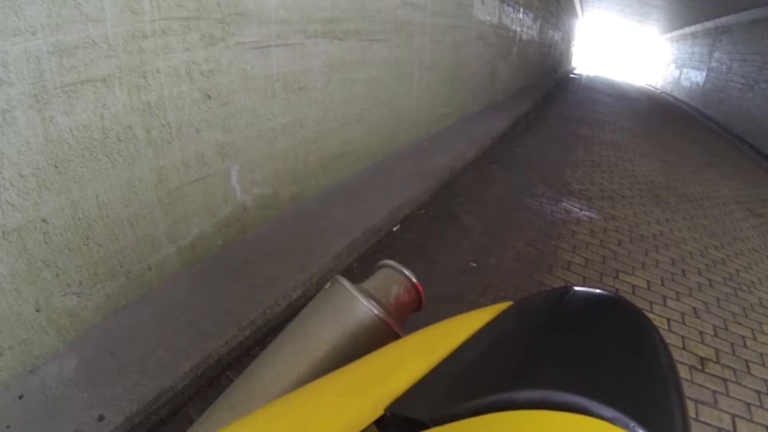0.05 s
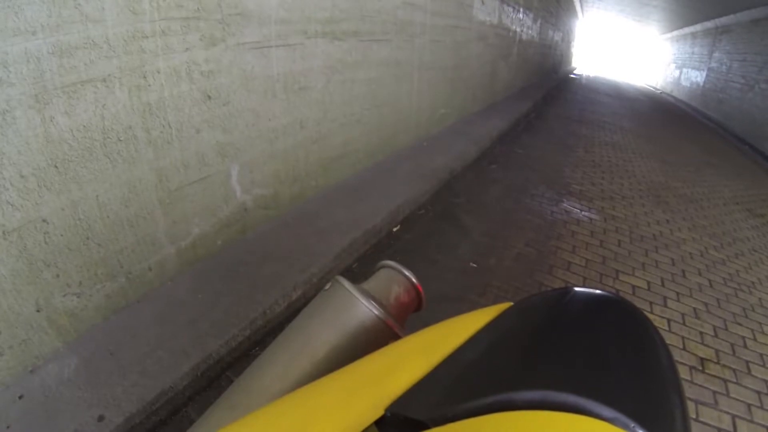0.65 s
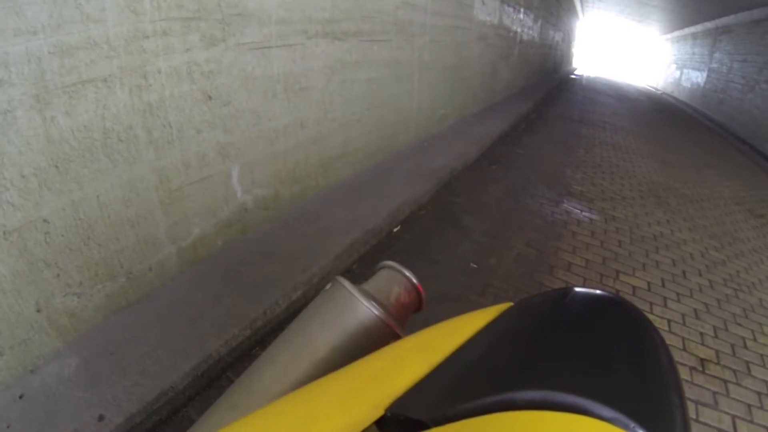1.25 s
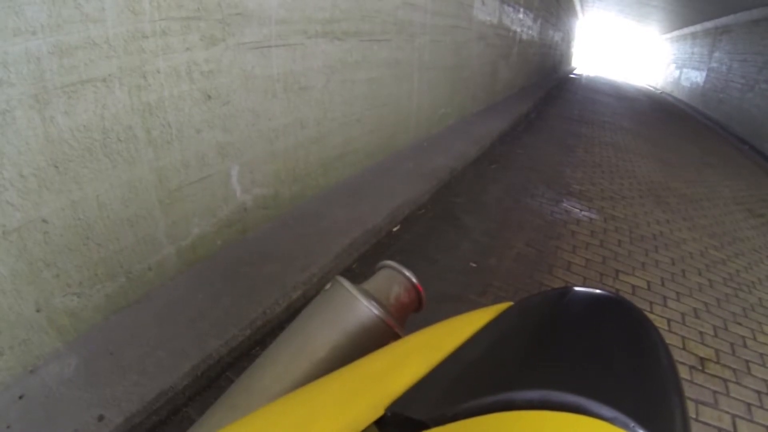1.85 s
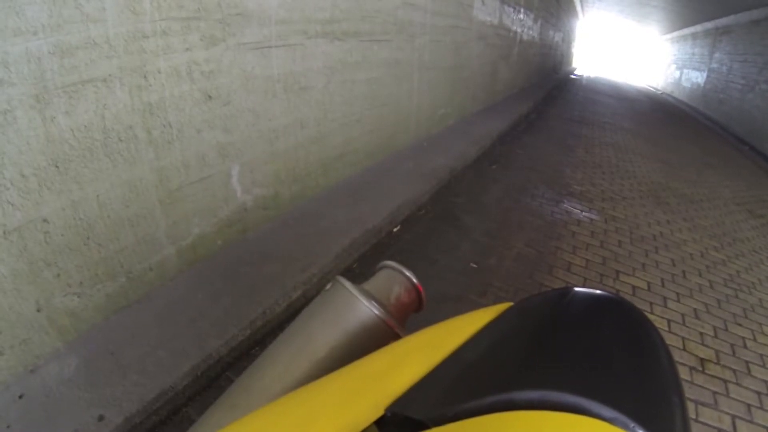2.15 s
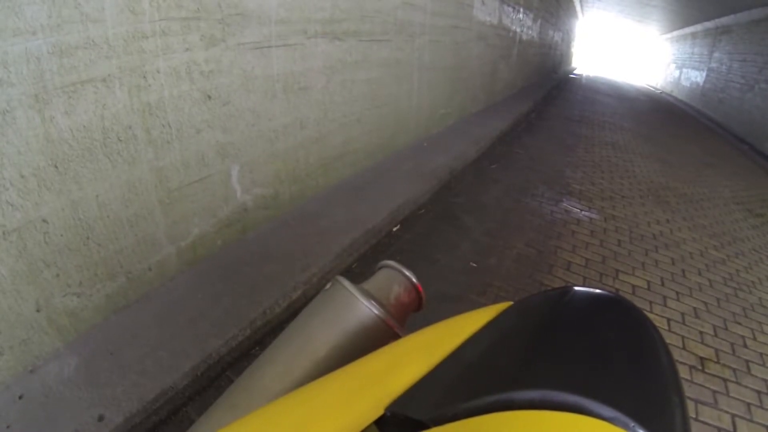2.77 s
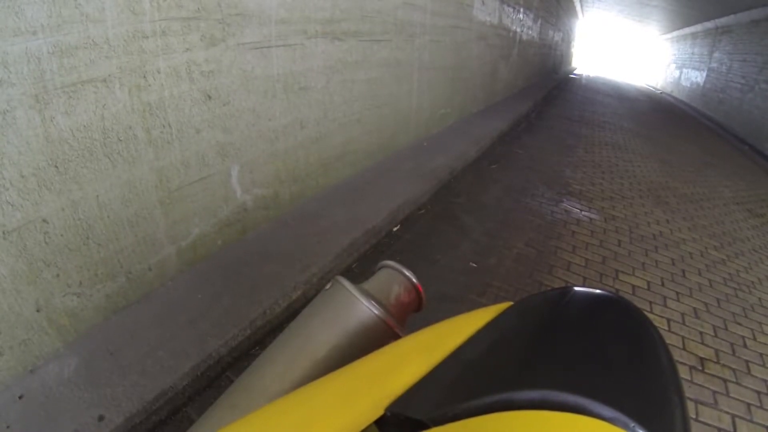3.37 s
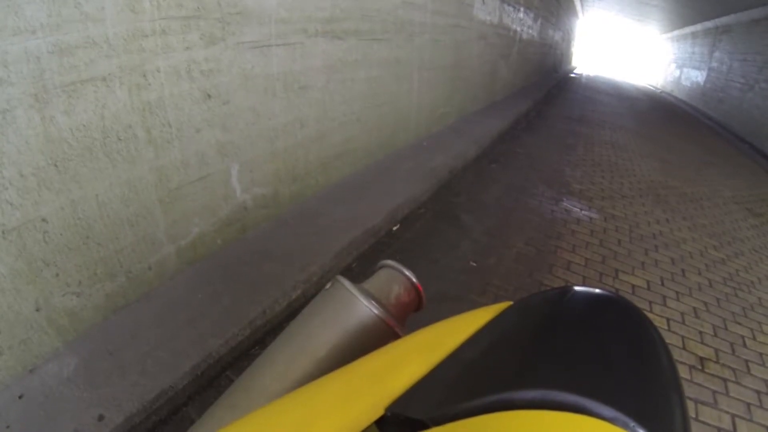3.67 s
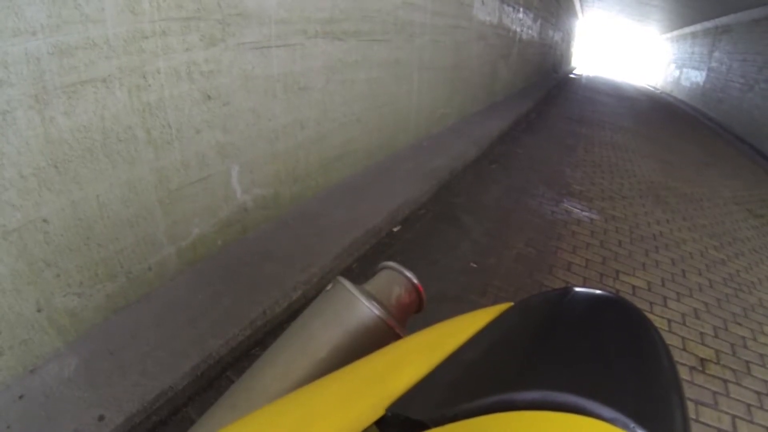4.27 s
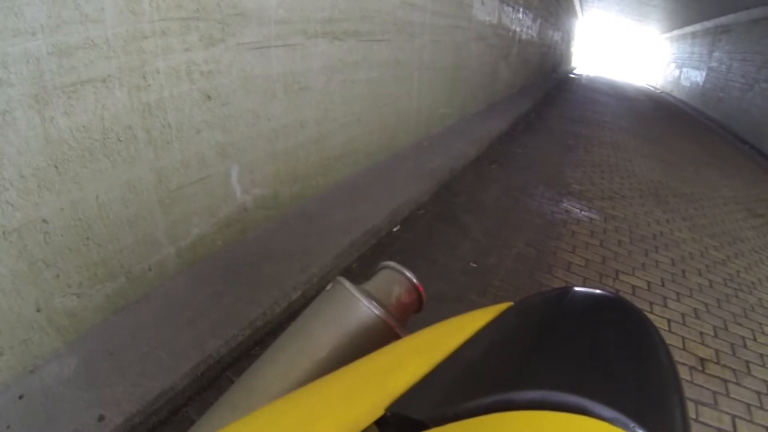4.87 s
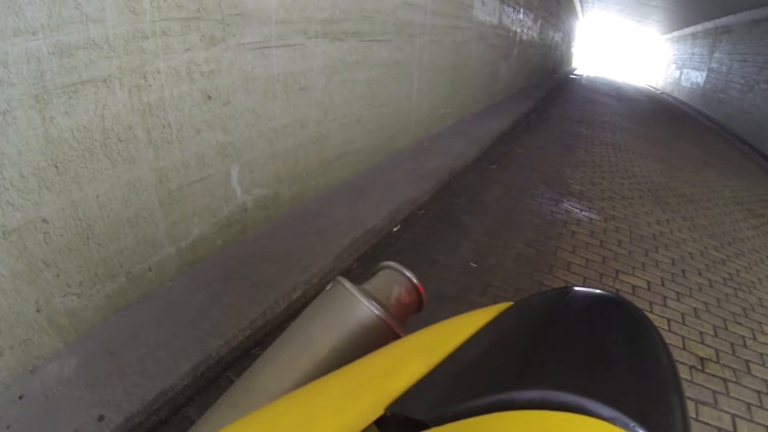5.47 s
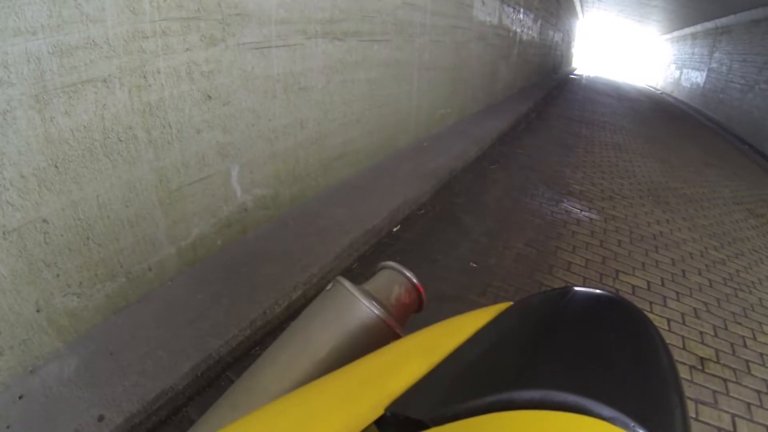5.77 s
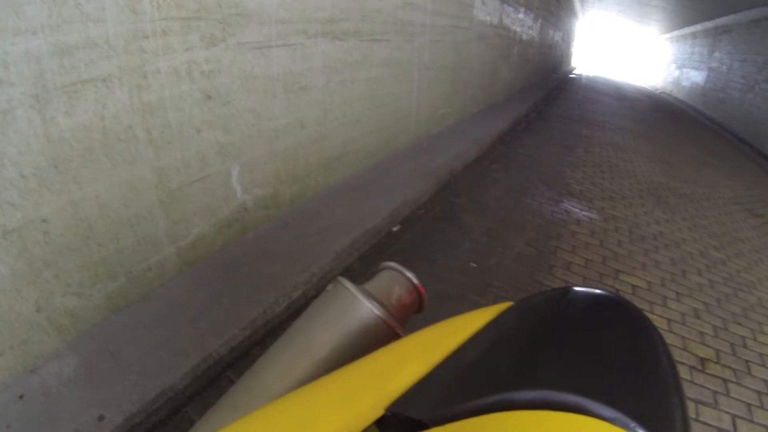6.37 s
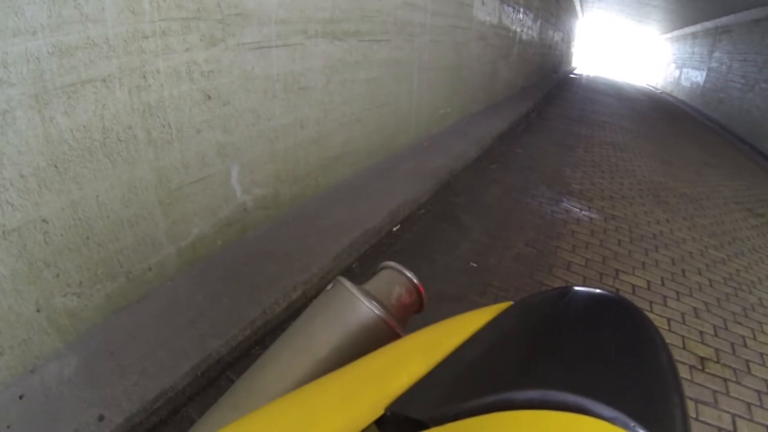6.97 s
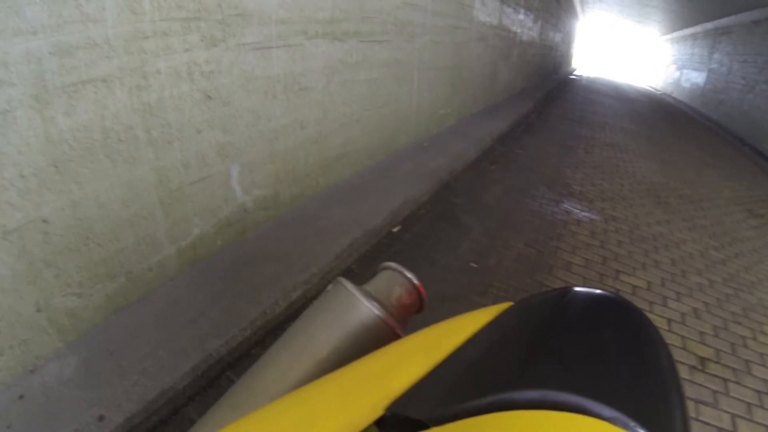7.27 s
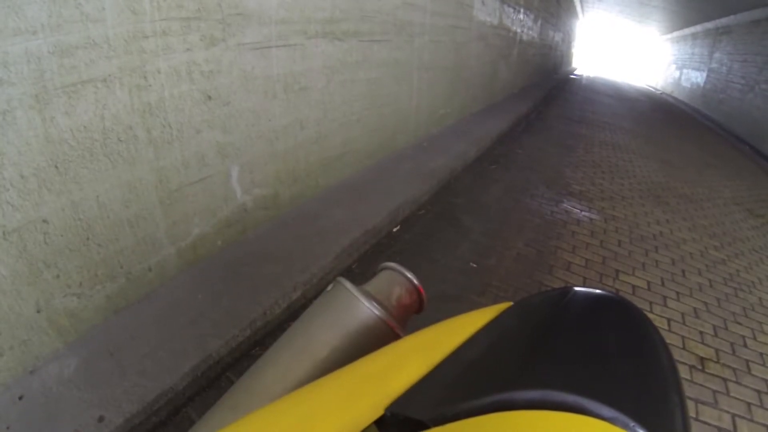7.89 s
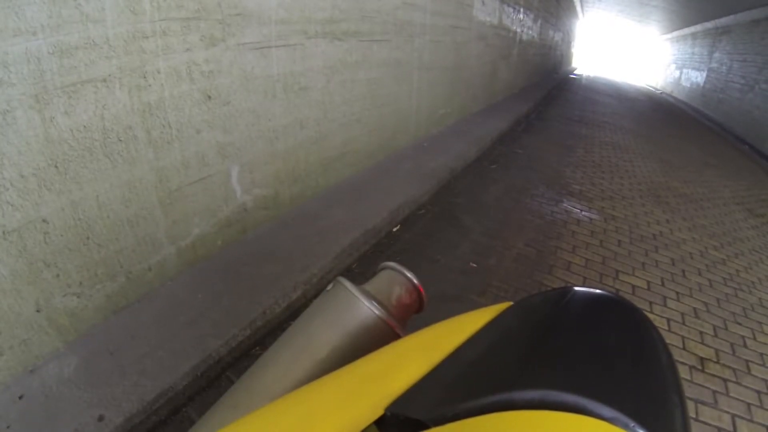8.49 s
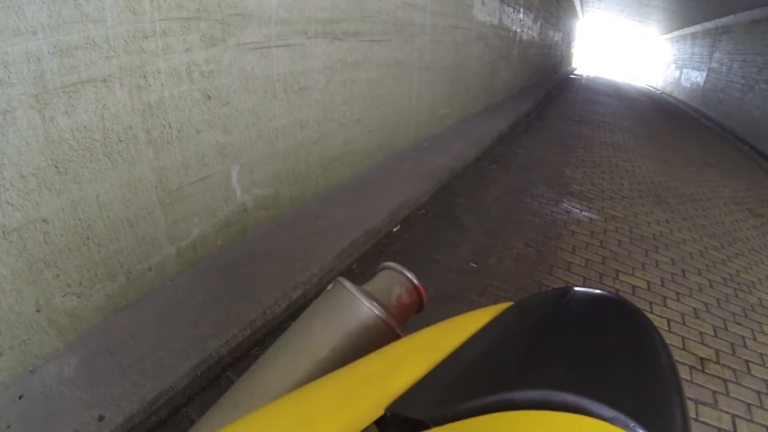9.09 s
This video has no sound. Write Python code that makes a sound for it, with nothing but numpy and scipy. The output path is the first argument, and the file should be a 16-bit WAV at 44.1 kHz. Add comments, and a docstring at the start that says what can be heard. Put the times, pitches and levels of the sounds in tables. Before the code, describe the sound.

A parked motorcycle idles with a deep thump and is revved three times, its exhaust popping and echoing in a concrete underpass.

```python
"""A parked V-twin motorcycle idles in a concrete underpass and is revved three times.
Each exhaust stroke fires a pressure pulse: round at idle, sharp under throttle, soft and ragged as
the engine coasts down, while the pipe burbles and barks and unburnt fuel pops in the silencer.
Valves clatter, slack metal clanks, gas roars and hisses, and a gear whines faintly.
The walls throw the exhaust back as echoes, a boom and a long tail over a low rumble."""
import sys
import numpy as np
from scipy import signal
from scipy.fft import rfft, irfft, next_fast_len
from scipy.io import wavfile
from scipy.ndimage import uniform_filter1d

SR = 44100
rng = np.random.default_rng(int(sys.argv[2]) if len(sys.argv) > 2 else 0)


def bounce(signal):
    """Save signal as a 16-bit WAV file at the path given by the first command-line argument."""
    frames = np.transpose(np.atleast_2d(signal))
    limited = np.clip(frames, -1, 1)
    pcm = np.round(limited * 32767).astype(np.int16)
    wavfile.write(sys.argv[1], SR, pcm)


N = 403074
TIME = np.arange(N) / SR
GRAIN_S = np.arange(-SR // 50, SR // 50) / SR  # time axis of one short hit, zero in the middle

# Idle speed, a little high after each rev; speeds count four-stroke cycles: time_s, speed_hz
IDLE = [(0, 10.96), (.8, 10.92), (2.55, 13.03), (3.2, 11.73), (3.4, 13.09), (5.05, 11.51), (5.25, 13.22),
        (5.65, 11.61), (6, 12.28), (8.1, 13.34), (8.7, 11.61), (9.14, 11.59)]
# Throttle blips, the last with a second stab:
# open_s, ease_s, shut_s, top_speed_hz, braking_hz_per_s, glide_hz_per_s
REVS = [(.822, 1.141, 1.262, 44.04, 44, 20.41), (3.396, 3.717, 3.82, 47.29, 44, 19.49),
        (5.964, 6.37, 6.375, 61.13, 43, 19), (6.43, 6.44, 6.445, 60.7, 51.19, 19.033)]
# Exhaust strokes, throttle shut and open: speed_hz, front_db, rear_db, width_ms, rear_lag_cycles
STROKES_SHUT = [(11.76, -7, -17.5, 0.84, .39), (13.43, -7, -17, 0.68, .38), (16.76, -5.5, -8, 0.65, .45),
                (20.17, -14, -9.5, 1.2, .47), (25.5, -20.5, -11.5, 1.25, .41), (26.8, -13.5, -9, 1.07, .39),
                (38.2, -11.5, -10.5, 0.61, 0.381), (46, -11.5, -8.5, 0.55, 0.39),
                (51.6, -11.5, -12, 0.45, 0.39), (56.5, -8.5, -8.5, 0.4, 0.395)]
STROKES_OPEN = [(12.9, -4, -9, .65, .345), (15.6, -2.2, -7, 0.48, 0.31), (18, -2.8, -3.8, 0.44, 0.32),
                (22.3, -4.3, -5.2, 0.45, .345), (27, -6, -4.8, 0.39, .37), (40, -4.3, -5.5, 0.36, .35),
                (58.4, -6.5, -3.5, 0.33, .355)]
# A soft third pulse in each cycle, at high speed with the throttle shut: speed_hz, level_db
AFTERPULSE = [(28, -36.5), (35, -20), (44, -22.5), (52, -18.5), (57, -25)]
# Stumbles just after the throttle eases: time_s, dip_db
STUMBLES = [(1.195, -4.5), (3.77, -2), (6.415, -5)]
# Afterfire in the silencer: time_s, level_db
POPS = [(1.891, -13.5), (1.939, -8.5), (1.985, -14), (4.028, -10.5), (4.559, -12.5), (4.657, -16),
        (4.774, -6.5), (6.615, -4.5), (6.961, -13), (7.019, -10), (7.434, -10.5), (7.475, -7.5),
        (7.523, -4.5), (7.530, -6.5), (7.627, -9), (7.636, -7.5), (7.755, -11.5)]
# Hollow bark of the front cylinder, throttle shut: speed_hz, level_db
BARK = [(11.2, -43), (12, -28.5), (13.3, -24), (14.5, -19.5), (17, -17), (23, -17.5), (29, -21.5),
        (42, -31)]
# Engine noise layers, throttle shut and open: speed_hz, roar_db, clatter_db, hiss_db
NOISES_SHUT = [(11.5, -31.5, -42, -83.5), (12.76, -32, -45, -80.5), (14.4, -26.5, -40, -70),
               (21, -28, -39, -66), (25, -26.5, -38, -64), (38.5, -25.5, -38, -59.5),
               (47, -18, -38.5, -66.5), (56.7, -19, -32.5, -61.5)]
NOISES_OPEN = [(15, -32, -39.5, -75), (22.1, -47, -37.5, -60), (33.5, -43.5, -37, -61.5),
               (44.4, -21.5, -38, -60.5), (57.2, -18.5, -33, -60)]
# Valve accents within each cycle: place_cycles, boost_db, width_cycles
VALVES = [(.29, 4, .04), (.75, 4, .04), (.85, 4, .035), (.96, 3.5, .035)]
# Rattle accents on the way up, at the top of a rev and on the way down: time_s, clatter_change_db
RATTLES = [(1.23, 4.5), (1.9, 3.5), (2.139, 2.5), (3.465, -2), (3.8, 7.5), (3.88, 6.5), (4.721, 2),
           (6.003, 1.5), (6.35, 0), (6.58, 7), (6.79, 2.5), (7.19, 4.5), (7.45, 4), (7.765, 2)]
# Slack metal clanking as the load changes and on the overrun: time_s, level_db
CLANKS = [(1.177, -29), (1.258, -30), (1.528, -30), (1.627, -28), (1.880, -31), (1.89, -31), (1.925, -30),
          (1.939, -30), (3.462, -31), (3.767, -26), (3.825, -30), (4.188, -29), (4.253, -35), (4.505, -27),
          (4.557, -33), (4.699, -38), (4.713, -35), (4.792, -38), (4.915, -31.5), (6.335, -26),
          (6.547, -24), (6.583, -29), (6.619, -28), (6.779, -30), (7.162, -28), (7.419, -28.5),
          (7.430, -35), (7.525, -32.5), (7.711, -30), (7.747, -30)]
# The ring of that metal: pitch_hz, level_db, t60_s
CLANK_MODES = [(1681, 0.5, .075), (1760, -11, 0.056), (1650, -10.5, 0.054), (2110, -13.5, 0.032),
               (1060, -13, .04)]
# Thumps that shake a loose part hardest: time_s, level_db
HARD_TICKS = [(0.793, -38), (2.7443, -44), (2.9884, -50), (3.239, -43), (3.3204, -45), (5.35, -48),
              (5.678, -42), (5.9344, -52), (6.0043, -31), (7.8106, -46), (8.2582, -38), (8.5, -40)]
# Thin spits of treble: time_s, level_db, width_s
SPITS = [(1.392, -65, 0.043), (1.727, -65, 0.0058), (4.025, -70, 0.045), (4.36, -61, 0.0084),
         (6.167, -66, 0.017), (6.594, -59.5, 0.025), (6.9, -64, 0.027), (7.233, -58, 0.009)]
# Gear whine at slow idle: speed_hz, level_db
GEAR_WHINE = [(10.9, -45.5), (11.7, -50), (12.6, -54), (14, -65)]
# Slaps off walls, floor and vault: delay_ms, gain
ECHOES = [(1.8, .08), (4.2, -.1), (5.7, -.11), (7.0, -.1), (8.4, .19), (16.6, .1), (17.6, .16), (24.7, .05),
          (33.1, .1), (41, .07), (44, -.12), (54, .1), (62.8, .05), (86, -.06), (96.6, -.06)]
# Standing waves across the underpass: pitch_hz, width_hz, level_db
BOOM = [(51.4, 12, 7), (101.1, 16, -.5), (121.9, 4, -0.5), (128.1, 4.7, -1), (165.7, 20, -6), (216, 10, -6),
        (344.6, 27, -2), (453, 13, -1.5)]
# Tones that keep sounding through the idle, two low ones ringing in the underpass and a faint high one:
# pitch_hz, waver_hz, level_db
HUMS = [(123.3, 4.4, -28.5), (241.2, 2.2, -31), (768, 8, -53)]
# Tone colour of each noise layer and of the reverb tail: frequency_hz, level_db
ROAR_EQ = [(170, -21), (350, 11), (600, 8.5), (670, 3.5), (765, 9), (900, -5), (1070, 2), (1280, -15.5),
           (1900, -32.5)]
HISS_EQ = [(2500, -17.5), (4700, 2), (5500, -5.5), (6400, 0.5), (7300, -7), (8400, 1), (9400, -7),
           (11000, -5), (12000, -15), (12700, -17), (14000, -29.5)]
CLATTER_EQ = [(900, -1.5), (1350, -8.5), (1550, -4), (1700, 1), (1820, -6.5), (2000, -5), (2600, -18),
              (3300, -22), (4000, -29), (4900, -34), (6100, -44.5)]
WHIR_EQ = [(3100, -2), (4800, 4), (6400, -7), (8400, -15.5), (11000, -23.5), (13000, -32)]
RASP_EQ = [(1500, -6.5), (1750, 8), (2200, -0.5), (2800, -6.5), (3500, -18)]
TICK_EQ = [(1500, -18.5), (3000, 5.5), (4400, -5), (6500, -9.5), (9000, -16.5), (12000, -25.5)]
SPIT_EQ = [(4000, -15), (8500, 0), (13000, -6), (15000, -25)]
RUMBLE_EQ = [(29, -13), (41, -4), (51, 4.5), (76, -17), (101, 1.5), (122, -4.5), (150, -2), (210, -26.5)]
TAIL_EQ = [(40, -25), (150, -9.5), (350, -6.5), (800, -5.5), (2000, -4), (6000, -12)]


def crank(catch_hz=27, lowest_hz=10, flywheel_s=.1, twist_s=.05, lead_s=.0075, holding_throttle=.28):
    """Each rev climbs, hangs, brakes until the engine catches, then glides down to idle."""
    speed, throttle = read(IDLE, TIME)[0], np.zeros(N)
    for opens, eases, shuts, top, braking, glide in REVS:
        catches = shuts + (top - catch_hz) / braking
        ends = catches + (catch_hz - lowest_hz) / glide
        rev = np.interp(TIME, [opens, eases, shuts, catches, ends],
                        [lowest_hz, top, top, catch_hz, lowest_hz])
        speed = np.maximum(speed, rev)
        held = (TIME > opens - lead_s) & (TIME < shuts)  # pulses harden before the crank picks up
        throttle += held * np.where(TIME < eases, 1, holding_throttle)
    return (uniform_filter1d(speed, round(flywheel_s * SR), mode="nearest"),
            uniform_filter1d(throttle, round(twist_s * SR), mode="nearest"))


def firing(phase, speed, throttle, jitter_ms=.28, uneven_db=2.2, after_cycles=.736, after_ms=.61):
    """Both cylinders and the afterpulse, ragged when coasting: time_s, level_db, width_ms, speed_hz."""
    cycles = np.arange(1, int(phase[-1]) + 1)
    rate, load = np.interp(cycles, phase, speed), np.interp(cycles, phase, throttle)
    front_db, rear_db, width_ms, lag = by_load(STROKES_SHUT, STROKES_OPEN, rate, load)
    after_db = read(AFTERPULSE, rate)[0] - 20 * load - np.interp(rate, [14, 28], [20, 0])
    ragged = (1 - load) * np.interp(rate, [14, 24], [0, 1])
    strokes = []
    for due, db, width in ((cycles, front_db, width_ms), (cycles + lag, rear_db, width_ms),
                           (cycles + after_cycles, after_db, np.full(len(cycles), after_ms))):
        late, strong = ragged * rng.standard_normal((len(cycles), 2)).T
        s = np.interp(due, phase, TIME) + late * jitter_ms / 1000
        stumble_db = sum(dip * bell(s - at, width=.024) for at, dip in STUMBLES)
        strokes.append(np.c_[s, db + stumble_db + uneven_db * strong, width, rate][due < phase[-1]])
    return np.vstack(strokes)


def pulse(width_ms, rebound):
    """A slug of gas leaves the pipe: one steep lobe, then a slower swing the other way."""
    ms = GRAIN_S * 1000
    lobe = bell(1.09 * ms, width_ms)
    swing_age = np.maximum(ms, 0) / (.78 + 1.846 * width_ms)
    swing = swing_age ** 3 * np.exp(-3 * swing_age)
    return rebound * swing * lobe.sum() / swing.sum() - lobe


def exhaust(strokes, uneven_db=.9, blare_db=-12):
    """No two burns are alike: soft strokes swing back harder, sharp ones make the silencer blare."""
    out, sharp = np.zeros(N), np.zeros(N)
    for s, db, width_ms, speed in strokes:
        level_luck, width_luck = rng.standard_normal(2)
        sharpness = np.interp(width_ms, [.48, .78], [1, 0])
        rebound = (1 - sharpness) * np.interp(speed, [13, 24], [1.88, .78]) + .6 * sharpness
        wave = from_db(db + uneven_db * level_luck) * pulse(width_ms * from_db(width_luck), rebound)
        add(out, s, wave)
        add(sharp, s, sharpness * wave)
    return out + from_db(blare_db) * resonance(sharp, hz=520, width_hz=380)


def afterfire():
    """Unburnt fuel goes off in the silencer, one sharp pulse to a pop."""
    out = np.zeros(N)
    for s, db in POPS:
        add(out, s, from_db(db) * pulse(width_ms=.5, rebound=.86))
    return out


def burble(gas, speed, throttle):
    """Under engine braking the pulses make the pipe burble unevenly, lower as the engine slows."""
    braking = gas * (1 - throttle) * flicker(depth_db=4, per_s=60)
    fast = np.interp(speed, [28.3, 35.4, 52, 60], [.046, .76, .67, .18])
    slow = np.interp(speed, [18, 23, 31, 37], [0, 1, 1, 0])
    return (from_db(-4) * resonance(braking * fast, hz=240, width_hz=170)
            + from_db(-5) * resonance(braking * slow, hz=170, width_hz=60))


def bark(phase, speed, throttle, pipe_hz=395, width_s=.0023, uneven_db=2):
    """Coasting down, the front valve opens on an empty cylinder and the pipe rings briefly."""
    out = np.zeros(N)
    ring = np.sin(2 * np.pi * pipe_hz * GRAIN_S) * bell(GRAIN_S, width_s)
    opens = np.interp(np.arange(1, int(phase[-1]) + 1), phase, TIME)
    strength = np.interp(opens, TIME, (1 - throttle) * from_db(read(BARK, speed)[0]))
    for s, gain in zip(opens, strength):
        add(out, s, gain * from_db(uneven_db * rng.standard_normal()) * ring)
    return out


def gas_rush(phase, roar_db, hiss_db, swell_db=.5):
    """Rushing gas roars in the mids and hisses on top, swelling slightly once a cycle."""
    swell = from_db(swell_db * np.cos(2 * np.pi * (phase + .023)))
    roar = from_db(roar_db - 6) * noise(ROAR_EQ) * flicker(depth_db=2, per_s=97)
    hiss = from_db(hiss_db - 4) * noise(HISS_EQ) * flicker(depth_db=6, per_s=660)
    return swell * (roar + hiss)


def valve_beat(phase):
    """A gain that jumps each time a valve works, unit rms."""
    accents_db = sum(db * bell((phase - place + .5) % 1 - .5, width) for place, db, width in VALVES)
    return rms_one(from_db(accents_db))


def valve_gear(phase, clatter_db):
    """Metal clatter and a thin gear whir beat with the valves."""
    clatter = from_db(clatter_db - .54) * noise(CLATTER_EQ) * flicker(depth_db=1.5, per_s=120)
    whir = from_db(-66 + .26 * (clatter_db + 42)) * noise(WHIR_EQ)
    return valve_beat(phase) * (clatter + whir)


def jangle(phase, speed, throttle, clatter_db, ring_hz=1700, width_hz=65):
    """Above idle the valves shake slack metal that rings at one pitch; load pulls it tight."""
    level_db = clatter_db - 6 - 4 * throttle + np.interp(speed, [13, 15.5], [-14, 0])
    knocks = rng.standard_normal(N) * flicker(depth_db=3.4, per_s=41) * valve_beat(phase)
    ring = resonance(resonance(knocks, ring_hz, width_hz), ring_hz, 10 * width_hz)
    return from_db(level_db) * rms_one(ring)


def rasp(phase, speed):
    """Near top speed the valve gear rasps, four times a cycle."""
    level_db = -39.5 + .24 * (speed - 50) + np.interp(speed, [30, 44], [-9, 0])
    beat_db = 3 * np.cos(4 * 2 * np.pi * phase)
    return from_db(level_db + beat_db) * noise(RASP_EQ) * flicker(depth_db=2, per_s=60)


def clanks(contact_s=.0012, uneven_db=2):
    """A brief contact sets slack metal ringing, with a different mix of its modes each time."""
    out = np.zeros(N)
    age = np.maximum(np.arange(-SR // 8, SR // 8) / SR, 0)
    attack = 1 - np.exp(-age / contact_s)
    for s, db in CLANKS:
        ring = sum(from_db(mode_db + uneven_db * rng.standard_normal() - 60 * age / t60)
                   * np.sin(2 * np.pi * hz * age) for hz, mode_db, t60 in CLANK_MODES)
        add(out, s, from_db(db + 2) * ring * attack)
    return out


def ticks(strokes, gap_s=.0031, width_s=.00068, hard_lag_s=.0015):
    """Each round, heavy thump at low speed ticks a loose part twice; the hardest make it crack."""
    gate = np.zeros(N)
    double_tick = from_db(-9) * bell(GRAIN_S, width_s) + bell(GRAIN_S - gap_s, width_s)
    for s, db, width_ms, speed in strokes:
        level_db = -37 + 2.67 * min(db + 5, 0) + .5 * rng.standard_normal()
        slowness = np.interp(speed, [13, 19], [1, .3])
        roundness = np.interp(width_ms, [.5, .72], [.2, 1])
        add(gate, s, double_tick * from_db(level_db) * slowness * roundness)
    for s, db in HARD_TICKS:
        add(gate, s + hard_lag_s, from_db(db - 3.5) * np.exp(-(GRAIN_S / width_s) ** 2))
    return gate * noise(TICK_EQ)


def spits(phase, sharpness=3):
    """Short crackles high in the treble, strongest on the front cylinder's stroke."""
    gate = sum(from_db(db) * bell(TIME - s, width_s) for s, db, width_s in SPITS)
    beat = rms_one(.2 + np.exp(sharpness * (np.cos(2 * np.pi * phase) - 1)))
    return gate * beat * noise(SPIT_EQ) * flicker(depth_db=4, per_s=500)


def whine(phase, speed, waves_per_cycle=66.6):
    """A wavering gear tone rides the crank and fades above slow idle."""
    waver = np.log(flicker(depth_db=7.5, per_s=49))
    tone = np.sin(2 * np.pi * waves_per_cycle * phase + waver) * flicker(depth_db=2, per_s=30)
    return from_db(read(GEAR_WHINE, speed)[0]) * rms_one(tone)


def underpass(x, t60_s=1.9, build_s=.035, tail_db=-7, drone_hz=241, drone_width_hz=5, drone_db=2):
    """Concrete adds distinct slaps, booming standing waves with one narrow drone, and a diffuse tail."""
    slaps = sum(gain * np.interp(TIME - ms / 1000, TIME, x, left=0) for ms, gain in ECHOES)
    modes = BOOM + [(drone_hz, drone_width_hz, drone_db)]
    boom = sum(from_db(db) * resonance(x, hz, width_hz) for hz, width_hz, db in modes)
    age = TIME[:2 * SR]
    build = 1 - np.exp(-(age / build_s) ** 2)
    decay = rng.standard_normal(len(age)) * from_db(-60 * age / t60_s) * build
    tail = signal.fftconvolve(x, coloured(decay / np.linalg.norm(decay), TAIL_EQ))[:N]
    return x + slaps + boom + from_db(tail_db) * tail


def rumble(speed, bed_db=-23.5):
    """The idle keeps the underpass rumbling and humming between thumps; the bed ducks as revs rise."""
    bed = from_db(bed_db) * noise(RUMBLE_EQ)
    for hz, waver_hz, db in HUMS:
        knots = rng.standard_normal(N // 100)
        pitch_hz = hz + waver_hz * np.interp(TIME * 20, np.arange(len(knots)), knots)
        hum = np.sin(2 * np.pi * np.cumsum(pitch_hz) / SR) * flicker(depth_db=2, per_s=13)
        bed += from_db(db) * rms_one(hum)
    return from_db(np.interp(speed, [14, 24, 36], [0, -3, -16])) * bed


def from_db(db):
    """Decibels to gain."""
    return 10 ** (np.asarray(db) / 20)


def rms_one(x):
    """Scale to unit rms."""
    return x / np.sqrt(np.mean(x ** 2) + 1e-20)


def bell(offset, width):
    """A Gaussian swell that peaks at 1."""
    return np.exp(-.5 * (offset / width) ** 2)


def read(rows, at):
    """Columns of a curve at the given times or speeds."""
    knots, *columns = np.transpose(rows)
    return np.array([np.interp(at, knots, c) for c in columns])


def by_load(shut, opened, speed, throttle):
    """Two tables read at the given speeds and crossfaded by the throttle."""
    return (1 - throttle) * read(shut, speed) + throttle * read(opened, speed)


def coloured(x, eq):
    """Apply an EQ curve that rolls off steeply beyond both ends."""
    hz, db = np.transpose(eq)
    size = next_fast_len(len(x))
    bins = np.maximum(np.fft.rfftfreq(size, 1 / SR), 1)
    gain = from_db(np.interp(np.log(bins), np.log(hz), db))
    skirts = np.minimum(bins / hz[0], 1) ** 2 * np.minimum(hz[-1] / bins, 1) ** 4
    return irfft(rfft(x, size) * gain * skirts, size)[:len(x)]


def noise(eq):
    """Coloured noise, unit rms."""
    return rms_one(coloured(rng.standard_normal(N), eq))


def flicker(depth_db, per_s):
    """A gain that wanders at random, unit rms."""
    knots = rng.standard_normal(N // 20)
    return rms_one(from_db(depth_db * np.interp(TIME * per_s, np.arange(len(knots)), knots)))


def resonance(x, hz, width_hz):
    """Two-pole band-pass, unity gain at its peak."""
    r = np.exp(-np.pi * width_hz / SR)
    feedback = [1, -2 * r * np.cos(2 * np.pi * hz / SR), r * r]
    return signal.lfilter(np.array([1, 0, -1]) * (1 - r * r) / 2, feedback, x + 1e-18)


def add(track, s, wave):
    """Lay a wave on the track, centred on time s."""
    at = round(s * SR) - len(wave) // 2 + np.arange(len(wave))
    inside = (at >= 0) & (at < N)
    track[at[inside]] += wave[inside]


def scene():
    """Speed and throttle play the engine: the exhaust rings in the underpass, the rest sits dry on top."""
    speed, throttle = crank()
    phase = .323 + np.cumsum(speed) / SR  # in engine cycles
    strokes = firing(phase, speed, throttle)
    roar_db, clatter_db, hiss_db = by_load(NOISES_SHUT, NOISES_OPEN, speed, throttle)
    clatter_db += sum(db * bell(TIME - s, width=.029) for s, db in RATTLES)
    engine = gas_rush(phase, roar_db, hiss_db) + valve_gear(phase, clatter_db)
    engine += jangle(phase, speed, throttle, clatter_db) + rasp(phase, speed)
    engine += ticks(strokes) + spits(phase)
    gas = exhaust(strokes) + afterfire()
    pipe = gas + burble(gas, speed, throttle) + bark(phase, speed, throttle)
    return (underpass(pipe) + rumble(speed) + engine + clanks() + whine(phase, speed))[None]


def record(dry, low_cut_hz=30, high_cut_hz=15700):
    """The microphone loses the deepest bass; peaks are soft-clipped and the top is cut."""
    thinned = signal.sosfilt(signal.butter(1, low_cut_hz, "high", fs=SR, output="sos"), dry)
    rounded = thinned / (1 + thinned ** 8) ** (1 / 8)
    return signal.sosfilt(signal.cheby2(12, 70, high_cut_hz, fs=SR, output="sos"), rounded)


dry = scene()
out = record(dry)
bounce(out)
```